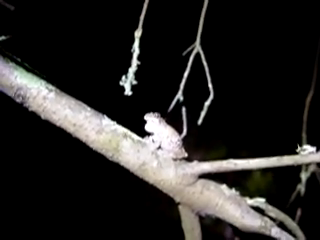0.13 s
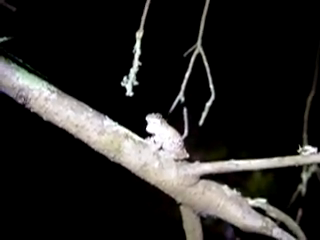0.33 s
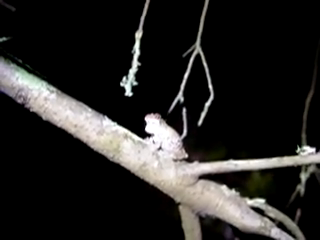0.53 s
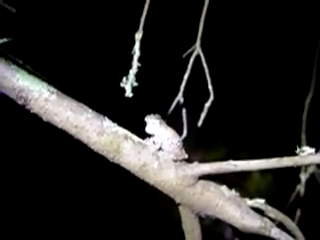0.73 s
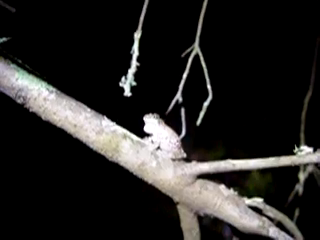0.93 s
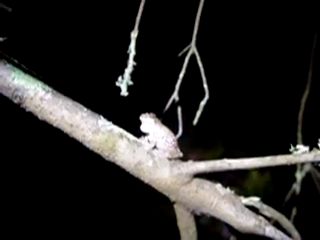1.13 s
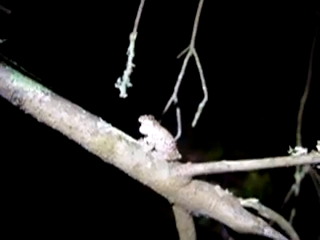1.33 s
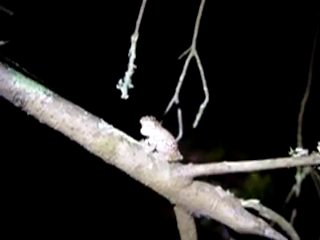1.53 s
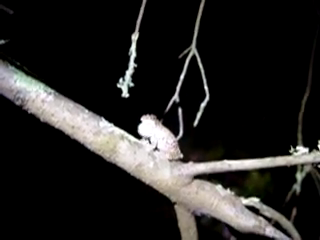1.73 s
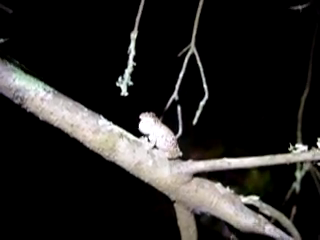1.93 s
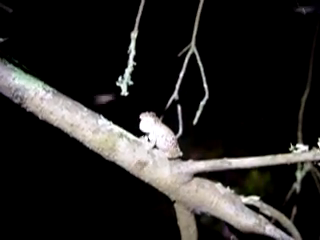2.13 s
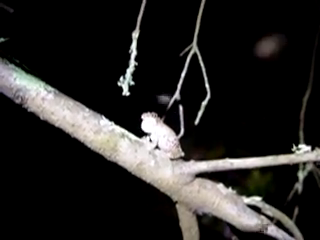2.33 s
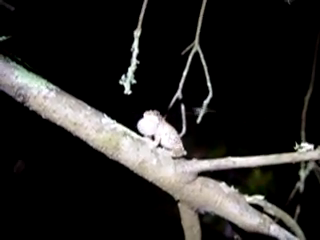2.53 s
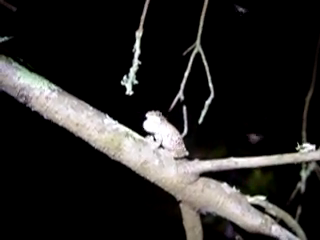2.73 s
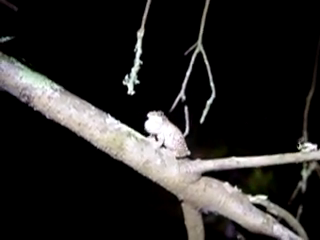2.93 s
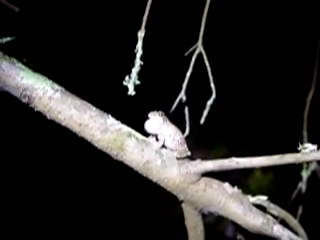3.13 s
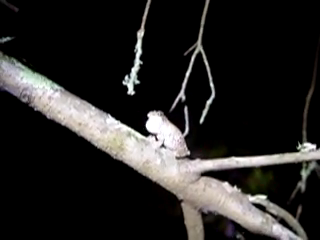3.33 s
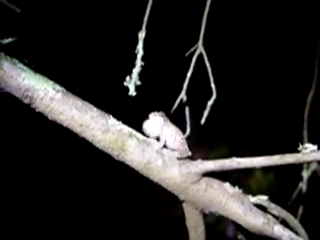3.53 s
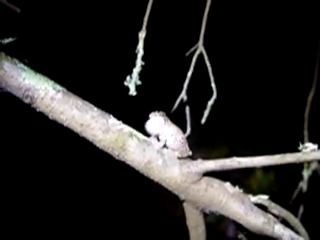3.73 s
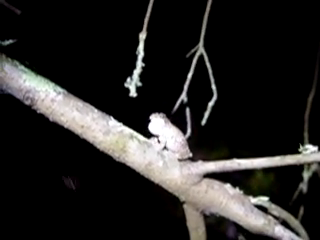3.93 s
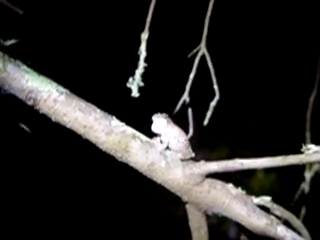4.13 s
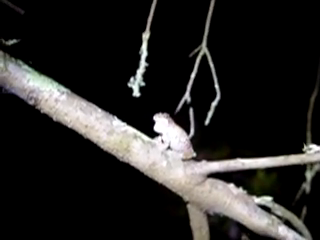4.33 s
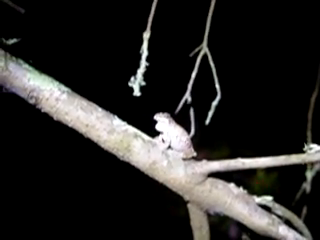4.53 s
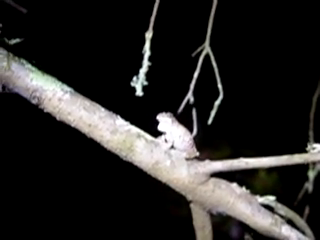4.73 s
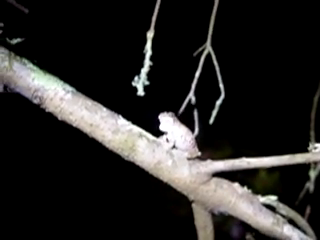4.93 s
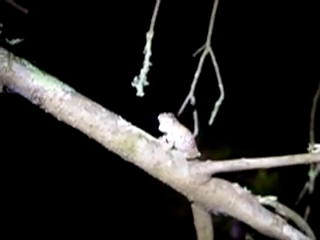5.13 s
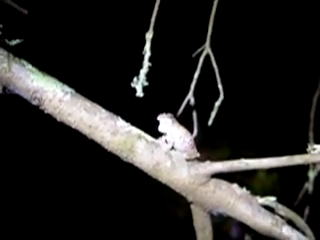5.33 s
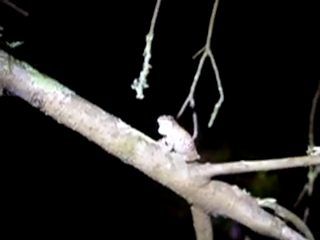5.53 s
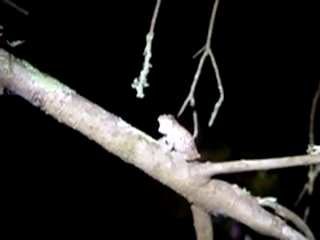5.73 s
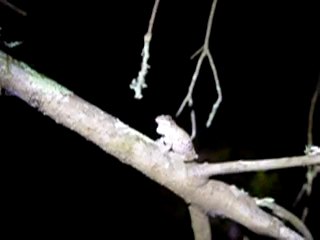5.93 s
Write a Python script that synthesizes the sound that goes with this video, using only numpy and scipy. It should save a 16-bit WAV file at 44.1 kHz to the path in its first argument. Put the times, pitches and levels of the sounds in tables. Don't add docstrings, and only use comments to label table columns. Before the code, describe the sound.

At night in a wetland, a shimmering swarm of clicking, scraping insects hangs over a low frog hum. A rival frog peeps steadily from the start. Then a pale treefrog on a branch, close to the microphone, pipes sixteen loud, clipped whistles. The insects sink beneath it. More rivals answer, and a big frog gives two low, pulsed grunts.

```python
import sys
import numpy as np
from scipy import signal
from scipy.fft import rfft, irfft, next_fast_len
from scipy.io import wavfile
from scipy.ndimage import uniform_filter1d, minimum_filter1d, map_coordinates

SR = 44100
rng = np.random.default_rng(int(sys.argv[2]) if len(sys.argv) > 2 else 0)


def volts_from_decibels(level):
    exponent = np.asarray(level, float) / 20
    return 10 ** exponent


def generate_wav(signal):
    frames = np.transpose(np.atleast_2d(signal))
    scaled = np.clip(frames, -1, 1) * 32767
    pcm = np.round(scaled).astype(np.int16)
    wavfile.write(sys.argv[1], SR, pcm)


N = 268569
T = np.arange(N) / SR

# pitch_hz, level_db (per Hz)
AIR_COLOUR = [(25, -10.5), (120, -17.5), (500, -10.5), (1100, -3.5), (1700, -12.5), (2050, -1), (2400, 12),
              (2900, 4.5), (3400, 0.5), (4500, 16.5), (5300, -1), (6450, 8), (6900, -24), (9700, -30),
              (11500, -41)]
# pitch_hz, width_hz, level_db
LOW_FROGS = [(768.5, 26.3, 1.5), (829.4, 34.4, 2.5), (888, 73, -0.5), (1096, 84, -9)]
# pitch_hz, width_hz, pulses_per_s, level_db
PULSING_KINDS = [(2564, 160, 45, -40.5), (2307, 300, 25, -41), (6300, 1100, 59, -45),
                 (5820, 1000, 50, -44.5)]
# pitch_hz, width_hz, clicks_per_s, level_db
CLICKER_KINDS = [(4083, 860, 97, 0), (4312, 540, 116, 1), (4612, 377, 81, 2.5), (4723, 300, 83, -0.5),
                 (3772, 450, 64, -7)]
# time_s, change_db
SWARM_SURGES = [(.05, 5.5), (1.17, -8), (1.27, 3.5), (1.7, 2), (1.9, 3.5), (2.102, 2), (2.15, 6.5),
                (2.41, 6), (2.542, 6.5), (2.828, 4.5), (2.965, 8.5), (3.088, 7.5), (3.2, 4), (3.46, 0.5),
                (3.81, -7.5), (4.19, -10), (5.15, 7), (5.19, -10)]
SURGE_S = .015
SWARM_DB, SWARM_SWAY_DB = -25, 1.5
# time_s, gain_db
SLOW_GAIN = [(0, 1.5), (1.7, 1.5), (2.3, 2), (2.7, 0), (3, -6), (3.3, -7.5), (3.6, -9.5), (3.9, -10),
             (4.2, -11), (4.5, -7.5), (5, -5), (5.5, -3), (6.09, -0.5)]
DUCK_DB, DUCK_IN_S, DUCK_OUT_S = -2, 0.036, 0.074

# start_s, end_s, start_hz, end_hz, level_db
LOW_WHINES = [(0, 0.708, 339.6, 364.5, -59.5), (0.322, 0.389, 406, 390, -57.5),
              (1.095, 1.587, 409, 386, -62.5), (1.132, 1.22, 658, 552, -56.5),
              (1.447, 1.922, 356.4, 363.4, -59), (1.942, 2.087, 572, 529, -45), (4.103, 4.2, 590, 590, -71),
              (4.96, 5.105, 528, 521, -67.5)]
# multiple, level_db
WHINE_PARTIALS = [(1, 1), (2, -10.5), (3, -13.5), (3.5, -13.5)]
# start_s, peak_db, pitch_hz
KNOCKS = [(5.117, -35.5, 317), (5.157, -44.5, 280)]

# start_s, length_s, pulses_per_s, level_db
BIG_FROG_GRUNTS = [
    (5.648, .135, 54.5, -28),
    (5.902, .115, 52, -28.5),
]
# pitch_hz, width_hz, level_db
VOCAL_SAC = [(254.7, 27, 0.5), (404, 83, -8), (580, 85, -14), (990, 140, -32.5), (1440, 330, -25),
             (1820, 220, -19.5)]

# first_end_s, notes, tires_after_note, level_db, growth_db (per note)
RIVAL_BOUTS = [
    (.114, 15, 10.5, -15.8, .16),
    (3.883, 14, 11.3, -23, .65),
]
BEAT_S, TIRED_S = .1217, .0095
RIVAL_HZ, SAG_HZ = 2403, 1.1
# end_s, level_db, pitch_hz
STRAY_NOTES = [(.022, -23.5, 2373), (2.4, -30, 2380), (2.655, -24, 2356), (4.41, -24, 2345),
               (4.795, -28, 2330), (4.83, -22.5, 2320), (5.19, -21, 2340), (5.24, -19.5, 2353),
               (5.44, -30, 2300), (5.568, -21.5, 2350), (5.599, -14.5, 2373), (5.629, -13.6, 2380),
               (5.96, -29, 2380), (5.997, -14, 2340)]
# end_s, level_db, pitch_hz
DISTANT_NOTES = [(.05, -36, 2150), (.115, -31, 2240), (.17, -40.5, 2200), (.24, -29, 2167),
                 (.365, -29, 2184), (.49, -28, 2180), (.62, -33, 2280), (.69, -35, 2160), (.75, -29, 2190),
                 (.81, -33, 2220), (.87, -40, 2110), (.93, -39.5, 2045), (1.05, -38, 2114),
                 (1.2, -38.5, 2165), (5.33, -29.5, 2250), (5.44, -29.5, 2255), (5.69, -29.5, 2190),
                 (5.81, -30.5, 2255), (5.93, -25, 2227), (6.05, -39, 2180)]
# delay_s, level_db
TRUNK_ECHOES = [(0.012, -27), (.027, -12.5), (0.044, -28.5)]

# start_s, length_s, opening_hz, peak_hz, peak_at (share of the note)
NEAR_NOTES = [(1.7795, .0326, 2455, 2512, .86), (1.9078, .0391, 2480, 2564, .73),
              (2.0972, .0446, 2500, 2556, .82), (2.3138, .0478, 2432, 2552, .58),
              (2.5585, .0513, 2365, 2534, .64), (2.7045, .046, 2368, 2424, .4),
              (2.8468, .0444, 2363, 2406, .35), (2.9679, .04, 2355, 2380, .45),
              (3.0891, .04, 2358, 2384, .42), (3.2093, .0407, 2352, 2382, .42),
              (3.3403, .0416, 2357, 2384, .4), (3.4686, .0407, 2356, 2380, .45),
              (3.5922, .0421, 2341, 2388, .42), (3.7406, .0428, 2364, 2386, .42),
              (3.9316, .0445, 2362, 2388, .42), (4.0721, .0417, 2361, 2382, .42)]
# multiple, level_db
WHISTLE_OVERTONES = [(2, -58.5), (3, -35.5), (4, -42.5), (5, -55.5), (6, -64.5)]
REST_HZ, FLICK_HZ, CUT_HZ = 2376, 52, 70
SETTLE, FLICK_FROM, FLICK_TAKES = .33, .7, .22
SLACK_FROM_S, SLACK_PER_S, SLACK_MOST = 3.35, 5, 4.2
STRAIN_DB_PER_HZ = -0.0065
COLD_DB, COLD_S = 14, 0.034

# pitch_hz, level_db (per Hz)
OVERLOAD_COLOUR = [(20, 14.5), (60, 9.5), (180, -5), (400, 1.5), (1200, -10.5), (6000, -11), (7300, -1.5),
                   (8500, -13), (9700, 2.5), (10600, -16.5), (12000, -6.5), (13500, -10.5), (15800, -12.5),
                   (16100, -64.5)]
# pitch_hz, level_db (per Hz)
FUZZ_COLOUR = [(1750, -43), (1930, 1.5), (2250, 12.5), (2700, -0.5), (3050, 1), (3200, -49.5)]
# pitch_hz, level_db (per Hz)
MIC_NOISE_COLOUR = [(20, -1.5), (120, -5), (700, -10), (1500, -17.5), (3000, -17.5), (8000, -23.5),
                    (9800, -23), (10100, -76)]
SCENE_TOP_HZ, TOP_HZ = 10040, 15830


def unit(x):
    return x / np.sqrt(np.mean(x ** 2) + 1e-20)


def wobble(rate):
    coarse = T[::32]
    knots = rng.standard_normal(int(N * rate / SR) + 4)
    return np.interp(T, coarse, map_coordinates(knots, [coarse * rate]))


def filtered(x, response):
    m = next_fast_len(N + SR // 2)
    return irfft(rfft(x, m) * response(np.fft.rfftfreq(m, 1 / SR)), m)[:N]


def resonance(f, hz, width):
    return 1j * f * width / (hz * hz - f * f + 1j * f * width)


def hiss(spectrum):
    hz, db = np.transpose(spectrum)
    colour = lambda f: volts_from_decibels(np.interp(np.log(f + 1), np.log(hz), db))
    return unit(filtered(rng.standard_normal(N), colour))


def scattered(x, t60):
    t, step = np.arange(SR // 2) / SR, SR // 4
    out = np.zeros(N + SR)
    for i in range(0, N, step):
        tail = rng.standard_normal(len(t)) * volts_from_decibels(-60 * t / t60) * (t > .004)
        wet = signal.fftconvolve(x[i:i + step], tail / np.linalg.norm(tail))
        out[i:i + len(wet)] += wet
    return out[:N]


def pulses(rate, scatter_db, jitter):
    turns = np.cumsum(rate * (1 + jitter * wobble(40))) / SR
    clicks = np.diff(np.floor(turns), prepend=0) > 0
    return clicks * volts_from_decibels(scatter_db * rng.standard_normal(N))


def air():
    return volts_from_decibels(-28 + 1.4 * wobble(12)) * hiss(AIR_COLOUR)


def chorus():
    out = np.zeros(N)
    for hz, width, db in LOW_FROGS:
        sway = volts_from_decibels(db + 1.7 * wobble(7.6) + 1.96 * wobble(50))
        out += sway * unit(filtered(rng.standard_normal(N), lambda f: resonance(f, hz, width) ** 2))
    return volts_from_decibels(-42.0) * unit(out)


def pulsing_voices():
    out = np.zeros(N)
    for hz, width, rate, db in PULSING_KINDS:
        ring = np.sin(2 * np.pi * hz * T + 1.8 * wobble(30))
        grit = 0.12 * np.sqrt(width) * rng.standard_normal(N)
        strokes = np.convolve(pulses(rate, scatter_db=3, jitter=0.09), np.hanning(400), "same")
        scrape = (ring + grit) * strokes
        out += volts_from_decibels(db) * unit(filtered(scrape, lambda f: resonance(f, hz, width) ** 2))
    return out


def swarm_db():
    duck, surge = np.zeros(N), np.zeros(N)
    for s, length, *_ in NEAR_NOTES:
        times = [s, s + DUCK_IN_S, s + length, s + length + DUCK_OUT_S]
        duck += np.interp(T, times, [0, DUCK_DB, DUCK_DB, 0])
    for s, db in SWARM_SURGES:
        surge += db * np.exp(-((T - s) / SURGE_S) ** 2)
    slow = 0.84 * np.interp(T, *np.transpose(SLOW_GAIN))
    return SWARM_DB + slow + duck + surge + SWARM_SWAY_DB * wobble(9)


def clickers():
    out = np.zeros(N)
    for hz, width, rate, db in CLICKER_KINDS:
        clicks = pulses(rate, scatter_db=4.0, jitter=.3) * volts_from_decibels(3 * wobble(25))
        gap_s = rng.uniform(0.001973, .0035)
        pair = lambda f: resonance(f, hz, width) ** 2 * (1 + 0.45 * np.exp(-2j * np.pi * f * gap_s))
        out += volts_from_decibels(db) * unit(filtered(clicks, pair))
    out = out + volts_from_decibels(-15) * scattered(out, t60=0.037)
    steady = out / np.sqrt(np.abs(uniform_filter1d(out ** 2, size=4000)) + 1e-9)
    return volts_from_decibels(swarm_db()) * steady


def small_sounds():
    out, drift, flutter = np.zeros(N), wobble(45), wobble(40)
    for start, end, from_hz, to_hz, db in LOW_WHINES:
        span = slice(round(start * SR), round(end * SR))
        along = (T[span] - start) / (end - start)
        pitch = from_hz + (to_hz - from_hz) * along + 0.0077 * from_hz * drift[span]
        turn = 2 * np.pi * np.cumsum(pitch) / SR
        tone = sum(volts_from_decibels(tone_db) * np.sin(k * turn) for k, tone_db in WHINE_PARTIALS)
        fade = np.clip(along * (1 - along) * 12, 0, 1)
        out[span] += volts_from_decibels(db + 8.5 - 5 * along + 3.9 * flutter[span]) * fade * tone
    t = np.arange(SR // 10) / SR
    for s, db, hz in KNOCKS:
        out[round(s * SR):][:len(t)] += volts_from_decibels(db - 60 * t / 0.047) * np.sin(2 * np.pi * hz * t)
    return out


def sac(f, modes):
    return sum((-1) ** k * volts_from_decibels(db) * resonance(f, hz, w) for k, (hz, w, db) in enumerate(modes))


def grunts():
    beats = np.zeros(N)
    for s, length, rate, db in BIG_FROG_GRUNTS:
        t = np.arange(0, length, 1 / rate)
        t = t * (1 + .04 * t / length) + rng.normal(0, .0004, len(t))
        shape_db = np.interp(t / length, [0, .2, .75, .87, 1.05], [-3.0, 1.0, 1.0, -3.5, -16])
        beats[np.round((s + t) * SR).astype(int)] = volts_from_decibels(db + shape_db + rng.normal(0, 1, len(t)))
    puff_fade = volts_from_decibels(-60 * np.arange(900) / SR / 0.086)
    puffs = rng.standard_normal(N) * np.convolve(beats, puff_fade)[:N]
    low = filtered(beats, lambda f: sac(f, VOCAL_SAC[:3]) / (1 + (225 / (f + 1)) ** 12))
    rasp = filtered(volts_from_decibels(-6) * beats + volts_from_decibels(-22) * puffs, lambda f: sac(f, VOCAL_SAC[3:]))
    dry = volts_from_decibels(48.0) * (low + volts_from_decibels(7.5) * rasp)
    return dry + volts_from_decibels(-12) * scattered(dry, t60=.1)


def bouts():
    notes = []
    for s, count, tires, db, grow_db in RIVAL_BOUTS:
        for k in range(count):
            end_s = s + BEAT_S * k + TIRED_S * max(0, k - tires)
            notes.append((end_s, db + grow_db * k, RIVAL_HZ - SAG_HZ * k))
    return notes


def rivals(notes, length, glide_hz, wet_db, echo_db, flutter_db):
    out, t = np.zeros(N + 2 * SR), np.arange(-length, .012, 1 / SR)
    swell_db = np.interp(t, [-length, -.7 * length, -.012, -.003, .004, .012],
                         [-24.5, -12, -0.5, 1, -9.5, -38])
    for s, db, hz in notes:
        turn = 2 * np.pi * np.cumsum(hz + 15 + glide_hz * t / length) / SR
        start = SR + round((s + .005 - length) * SR)
        out[start:][:len(t)] += volts_from_decibels(db + 2.5 + swell_db) * np.sin(turn)
    dry = out[SR:SR + N] * volts_from_decibels(flutter_db * wobble(120))
    echoes = np.zeros(N)
    for s, db in TRUNK_ECHOES:
        echoes += volts_from_decibels(db + echo_db + 1.3 * wobble(26)) * np.roll(dry, round(s * SR))
    return dry + echoes + volts_from_decibels(wet_db) * scattered(dry, t60=0.29)


def note_pitch(u, opening, peak, at):
    climb = opening + (peak - opening) * (np.minimum(u, at) - .1) / (at - .1)
    fall = (peak - REST_HZ) * np.clip((u - at) / SETTLE, 0, 1) ** 2
    flick = FLICK_HZ * np.clip((u - max(FLICK_FROM, at + SETTLE)) / FLICK_TAKES, 0, 1)
    return climb - fall + flick - CUT_HZ * np.clip((u - .94) * 10, 0, 1)


def near_frog():
    tone, swell = np.zeros(N), np.zeros(N)
    for s, length, opening, peak, at in NEAR_NOTES:
        t = np.arange(-.02, length + .008, 1 / SR)
        slack = 1 + np.clip(SLACK_PER_S * (s - SLACK_FROM_S), 0, SLACK_MOST)
        cold_db = COLD_DB * np.exp(-(s + t - NEAR_NOTES[0][0]) / COLD_S)
        strain_db = STRAIN_DB_PER_HZ * (opening - RIVAL_HZ) + cold_db
        pitch = uniform_filter1d(note_pitch(t / length, opening, peak, at), size=100)
        turn = 2 * np.pi * np.cumsum(pitch) / SR
        times = [-.02, -.003 * slack, 0.00096 * (slack - 1), 0.0057 * slack,
                 length - .002, length, length + 0.0041]
        level_db = np.interp(t, times, [-63, -45.5, -6.5, -5, 0.0, -7.5, -65])
        voice = np.sin(turn)
        for k, db in WHISTLE_OVERTONES:
            loudness = volts_from_decibels(db + strain_db + rng.normal(0, 1.5) - 3)
            hoarse = np.cumsum(rng.normal(0, .03 * k, len(t)))
            voice = voice + loudness * np.sin(k * turn + hoarse)
        start = round((s - .02) * SR)
        swell[start:][:len(t)] = volts_from_decibels(uniform_filter1d(level_db, size=100))
        tone[start:][:len(t)] = voice
    dry = volts_from_decibels(2.5) * swell * tone * volts_from_decibels(0.12 * wobble(160))
    return dry + volts_from_decibels(-28.5) * scattered(dry, t60=0.79)


def scene():
    gain = volts_from_decibels(np.interp(T, *np.transpose(SLOW_GAIN)))
    background = gain * (pulsing_voices() + chorus() + air()) + clickers()
    steady = rivals(bouts(), length=.05, glide_hz=92.3, wet_db=-10.5, echo_db=0.0, flutter_db=1.5)
    stray = rivals(STRAY_NOTES, length=.032, glide_hz=70, wet_db=-9.5, echo_db=-5.5, flutter_db=3.0)
    far = rivals(DISTANT_NOTES, length=0.052, glide_hz=40.2, wet_db=0.5, echo_db=-4.0, flutter_db=8.5)
    others = steady + stray + volts_from_decibels(-4.5) * far
    whole = background + small_sounds() + grunts() + others + gain ** 0.097 * near_frog()
    return whole[None]


def starved(x, depth_db):
    hz, t, z = signal.stft(x, SR, nperseg=512)
    band = uniform_filter1d(np.abs(z) ** 2, size=5, axis=0)
    usual = uniform_filter1d(band, size=40, axis=1)
    keep = (band > usual * volts_from_decibels(2 * depth_db)) | (hz[:, None] < 2900)
    return signal.istft(z * np.where(keep, 1, .1), SR, nperseg=512)[1][:N]


def fuzz(whistle, linger):
    reach = round(linger * SR)
    power = uniform_filter1d(whistle ** 2, size=reach, origin=reach // 3)
    return np.sqrt(np.abs(power)) * hiss(FUZZ_COLOUR)


def roll_off(x):
    return signal.sosfilt(signal.butter(12, 16410, fs=SR, output="sos"), x)


def record(dry):
    x = filtered(dry[0], lambda f: 1 / (1 + (f / SCENE_TOP_HZ) ** 60))
    x = x + volts_from_decibels(-60.5) * hiss(MIC_NOISE_COLOUR)
    size = np.abs(signal.hilbert(x, next_fast_len(N))[:N])
    gain = volts_from_decibels(0.67 * np.interp(T, *np.transpose(SLOW_GAIN)))
    over = np.clip(uniform_filter1d(size, size=200) - .6, 0, .3) * gain
    need = np.minimum(1, .725 / (size + 1e-9))
    x = x * uniform_filter1d(minimum_filter1d(need, size=301, origin=80), size=133)
    x = starved(x, depth_db=-6.5)
    whistle = filtered(x, lambda f: resonance(f, 2420, 360))
    x = x + volts_from_decibels(-21.5) * fuzz(whistle, linger=0.021)
    x = x + volts_from_decibels(-30 + 4.54 * wobble(220)) * over * hiss(OVERLOAD_COLOUR)
    x = x + volts_from_decibels(-25) * filtered(over, lambda f: 1j * f / (6 + 1j * f) / (1 + 1j * f / 22))
    x = x / (1 + np.abs(x / .72) ** 24) ** (1 / 24)
    x = filtered(x, lambda f: f < TOP_HZ)
    return roll_off(x[None])


dry = scene()
out = record(dry)
generate_wav(out)
```